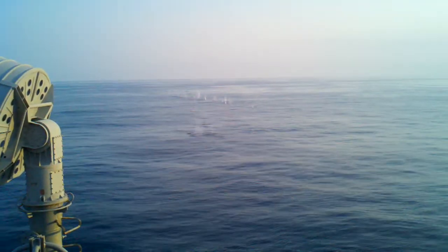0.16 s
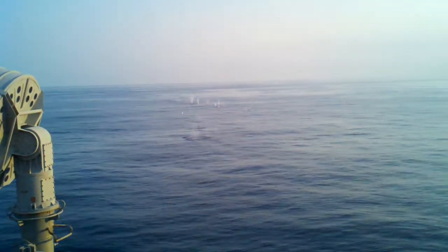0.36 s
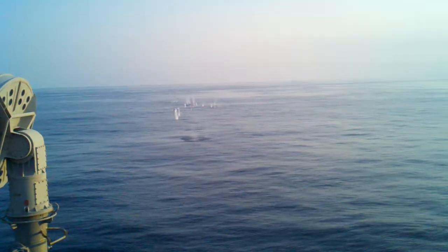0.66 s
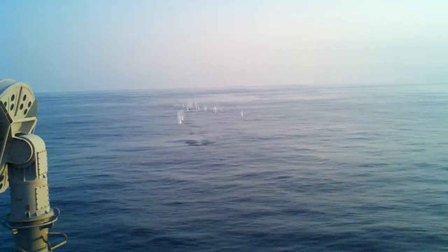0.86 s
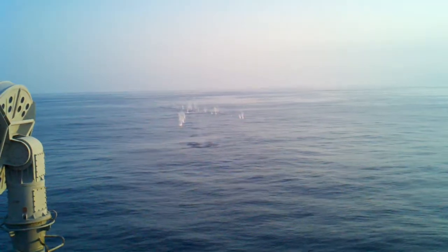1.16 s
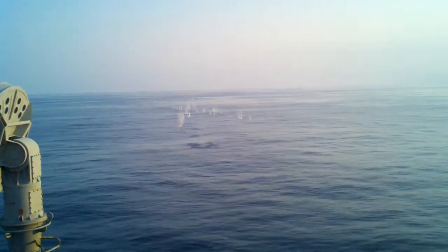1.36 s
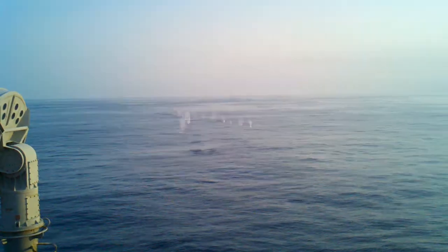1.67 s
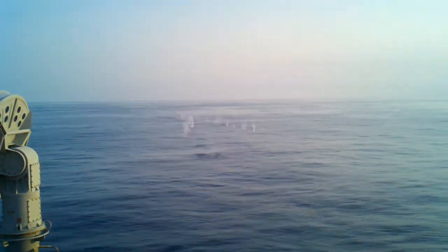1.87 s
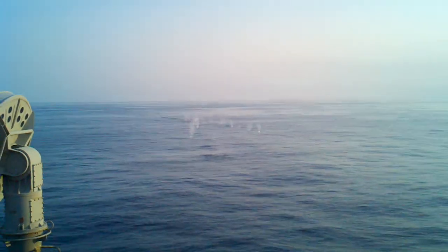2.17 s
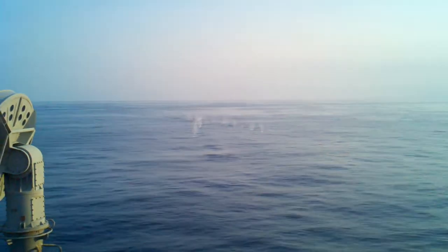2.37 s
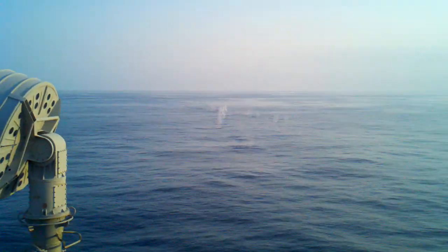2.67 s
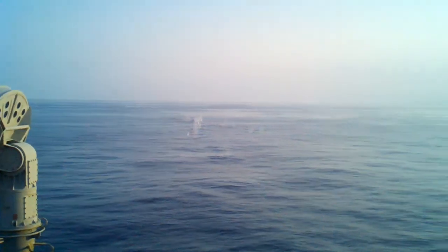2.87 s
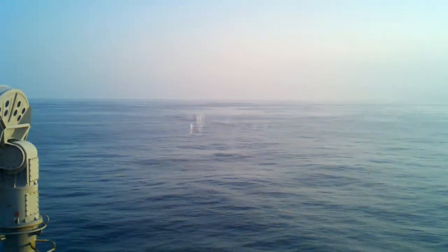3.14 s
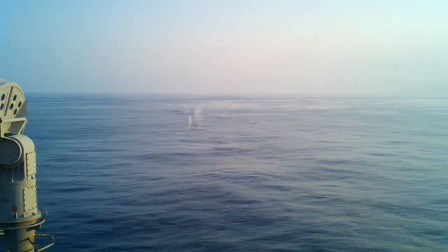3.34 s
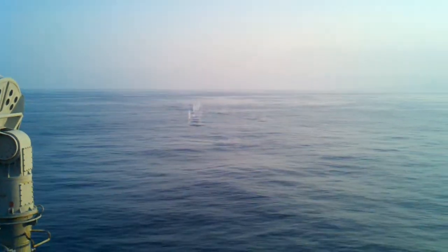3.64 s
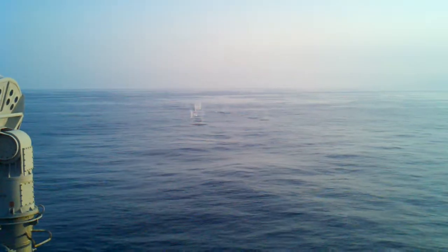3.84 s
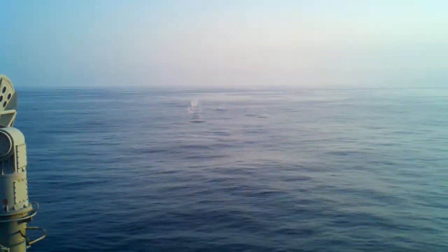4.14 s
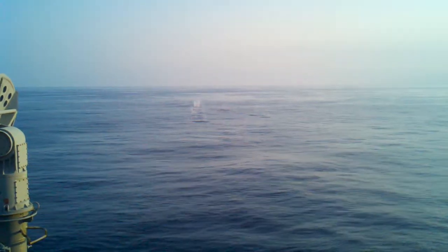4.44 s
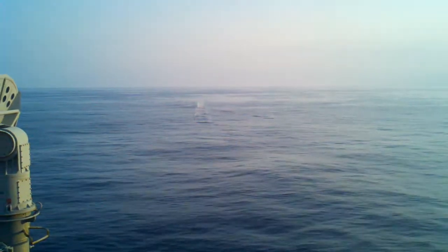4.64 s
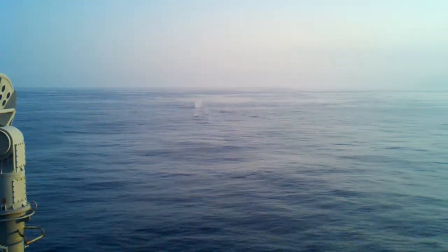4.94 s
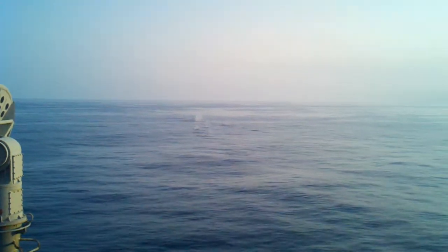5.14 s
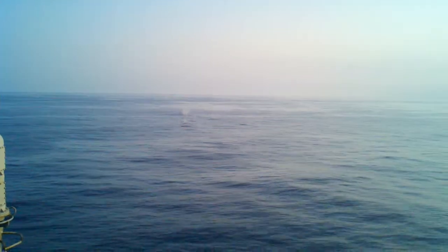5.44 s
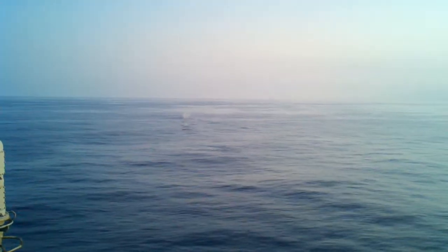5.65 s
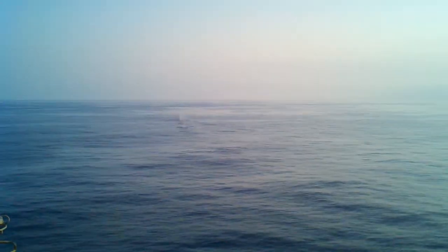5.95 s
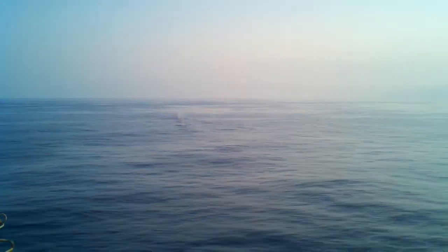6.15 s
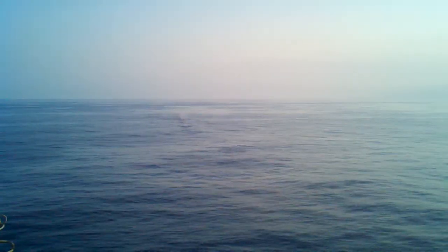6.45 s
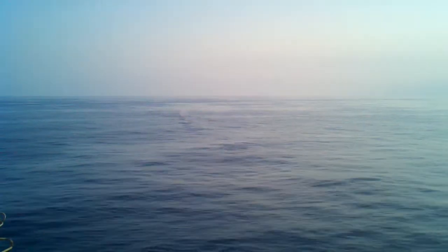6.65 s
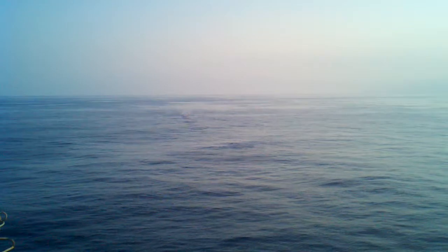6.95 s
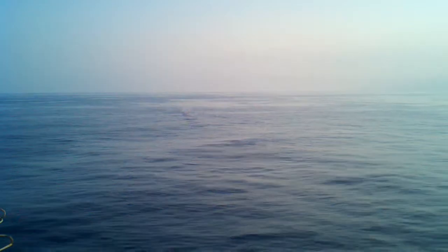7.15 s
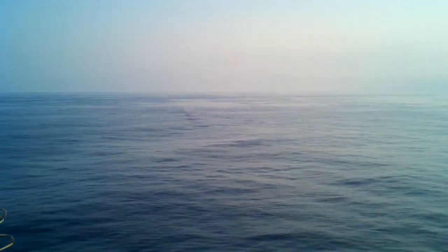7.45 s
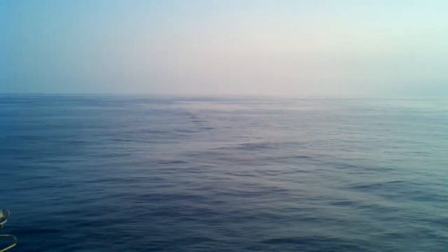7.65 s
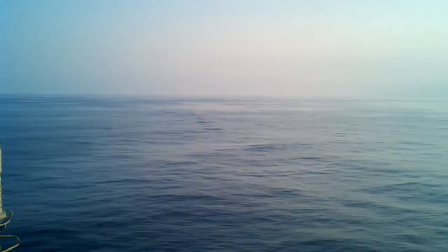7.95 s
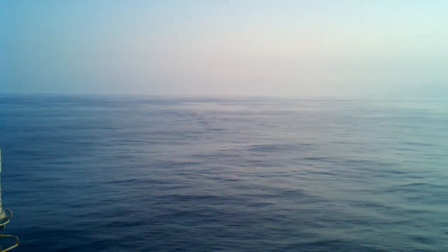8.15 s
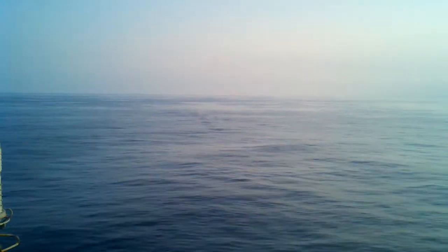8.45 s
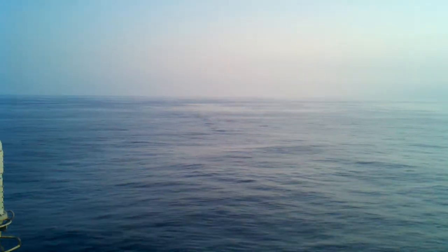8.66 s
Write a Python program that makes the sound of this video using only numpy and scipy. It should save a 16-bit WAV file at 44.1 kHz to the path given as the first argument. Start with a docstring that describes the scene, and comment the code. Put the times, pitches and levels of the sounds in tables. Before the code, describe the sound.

On a ship's deck at sea, a close machine gun snaps a very short burst while a slower, duller gun starts a three-second run. Bright close bursts cut through and outlast it. The fire stops, echoes roll across the water, and wind, distant thuds and faint brass tinkles show through. Three more short close bursts follow, the last longer. The stereo microphone is overloaded, gritty and clipped.

```python
"""Two close machine guns' worth of fire opens on a ship's deck: a short bright burst, then a slower gun farther off
fires one long burst, with more short close bursts through it and after it, over open sea.
Each shot is a filtered pulse with ringing steel reflections, noise crackle and a roll over the water.
In the pauses, shaped noise gives wind and sea, with distant thuds, rustles and sine-mode rings of spent cases.
The shots overload a stereo microphone: they are limited, widened and clipped."""
import sys
import numpy as np
from scipy import signal
from scipy.fft import rfft, irfft, next_fast_len
from scipy.io import wavfile
from scipy.ndimage import uniform_filter1d

SR = 44100
rng = np.random.default_rng(int(sys.argv[2]) if len(sys.argv) > 2 else 0)


def digitize_waveform(pressure):
    """Quantize a signal to 16-bit integers and store it at the path in sys.argv[1].

    Rows of a 2-D input are taken as channels; values are limited to [-1, 1].
    """
    field = np.atleast_2d(pressure).T
    bounded = np.clip(field, -1, 1)
    quanta = np.round(bounded * 32767).astype(np.int16)
    wavfile.write(sys.argv[1], SR, quanta)


N = 388521  # samples


def amp(db):
    """Turns decibels into an amplitude factor."""
    return 10 ** (np.asarray(db) / 20)


def read(points, hz, axis=1):
    """Reads one column of a spectrum, joined on a log-frequency axis."""
    columns = np.transpose(points)
    return np.interp(np.log(hz + 1), np.log(columns[0] + 1), columns[axis])


def add(mix, s, sound):
    """Mixes a sound in at time s, trimming what falls outside."""
    start = round(s * SR)
    sound = sound[..., max(-start, 0):]
    part = mix[..., max(start, 0):][..., :sound.shape[-1]]
    part += sound[..., :part.shape[-1]]


def wander(size, count):
    """Draws a random line through count points."""
    return np.interp(np.arange(size), np.linspace(0, size, count), rng.standard_normal(count))


def pulse(points, axis=1, size=4096):
    """Builds the sharpest causal (minimum-phase) pulse with a given spectrum."""
    hz = abs(np.fft.fftfreq(size, 1 / SR))
    log_gain = np.log(amp(read(points, hz, axis)))
    return np.fft.ifft(np.exp(np.conj(signal.hilbert(log_gain)))).real


def colour(x, points, axis=1):
    """Filters both channels by a spectrum."""
    return signal.oaconvolve(x, pulse(points, axis)[None], axes=1)[:, :x.shape[1]]


# Side level of sound arriving from all round. Each row: frequency in Hz, gain in dB.
SURROUND_SIDE = [(40, 3), (110, -6.5), (300, -5.5), (700, -5.5), (1300, 3), (2000, 2), (4000, -1),
                 (14000, 0)]


def diffuse(x):
    """Shapes the side of a (mid, side) pair as two close capsules hear sound from all round."""
    return np.vstack([x[:1], colour(x[1:], SURROUND_SIDE)])


def arrivals(db, hold_s, t60, tail_db, tail_t60, wall_s, wall_db, wall_t60, size=22050):
    """Envelope of reflections: the deck holds, then dies into a longer tail; a wall sends a late cluster."""
    t = np.arange(size) / SR
    nearby = amp(db - 60 * np.maximum(t - hold_s, 0) / t60)
    wall = (t > wall_s) * amp(wall_db - 60 * abs(t - wall_s) / wall_t60)
    tail = amp(tail_db - 60 * t / tail_t60)
    return np.sqrt(nearby ** 2 + wall ** 2 + tail ** 2)


def deck(envelope, spectrum, rings, width_hz, between_db, ring_s, size=22050, count=2):
    """Fixed reflections of one gun: early ones coloured by the steel's resonances, late ones toneless."""
    t, hz = np.arange(size) / SR, np.fft.rfftfreq(size, 1 / SR)
    peaks = sum(amp(db) ** 2 / (1 + (2 * (hz - f) / width_hz) ** 2) ** 2 for f, db in rings)
    ringing = np.sqrt(amp(between_db) ** 2 + peaks)
    early, late = rng.standard_normal((2, 2, size))
    for _ in range(count):  # the arrivals share out their energy among the resonances
        phase = np.angle(rfft(early * envelope))
        early = irfft(ringing * np.exp(1j * phase), size)
        early /= np.sqrt(uniform_filter1d(early ** 2, size=300, axis=1) + 1e-20)
    share = 1 / (1 + (t / ring_s) ** 8)  # early and late carry equal energy at ring_s
    blend = np.sqrt(share) * early + np.sqrt(1 - share) * late
    return amp(0.5) * diffuse(colour(blend * envelope, spectrum))


def gun(shots, blast, spectrum, reflections, gain_db, crackle_t60, snap_db, snap_s, bounce_s, bounce_db,
        slap_s, slap_db, lead_s, skew_s, grain_db):
    """Each shot repeats one blast and deck bounce; its echoes waver and its crackle is new every time."""
    t = np.arange(reflections.shape[1]) / SR
    report = np.zeros_like(reflections)
    add(report[0], 0, pulse(blast))
    add(report[0], bounce_s, amp(bounce_db) * pulse(blast))
    add(report[1], skew_s, -pulse(blast, axis=2))
    snap = amp(snap_db) * np.exp(-(t / snap_s) ** 2)
    envelope = amp(5.0 - 60 * t / crackle_t60) + snap + amp(-10 - 60 * t / 0.22)
    slap = report[0] + .5 * reflections[0]  # a far wall of the ship throws the shot back
    body, crackle = np.zeros((2, 2, N))
    for s, db, crackle_db in shots:
        level_db = db + gain_db
        wavering = reflections * amp(1.66 * wander(len(t), count=40))
        add(body, s - lead_s, amp(level_db) * (report + wavering))
        add(body[0], s + slap_s, amp(level_db + slap_db + 2.0 * rng.standard_normal()) * slap)
        grain = amp(grain_db * wander(len(t), count=256)) * rng.standard_normal((2, len(t)))
        add(crackle, s - lead_s, amp(level_db + crackle_db) * envelope * grain)
    return body + diffuse(colour(crackle, spectrum, axis=2))


# Close bursts, two of which overlap once. Each row: first shot in seconds, last shot in seconds,
# relative strength in dB, extra crackle in dB.
CLOSE_BURSTS = [(-.043, 0.0496, -12, 2), (1.363, 1.552, -10.5, -1), (2.5915, 3.6242, -10, -1),
                (5.618, 5.819, -11, 5), (5.8, 6.1738, -10.5, -1), (7.0178, 7.207, -10, -1),
                (8.3200, 8.7890, -10.5, 0.5)]


def near_shots():
    """Close guns cycle evenly while the trigger is held: (s, strength dB, extra crackle dB) per round."""
    cycle_s = .094  # nominal: each burst is divided evenly
    return [(s, db, crackle_db) for first, last, db, crackle_db in CLOSE_BURSTS
            for s in np.linspace(first, last, round((last - first) / cycle_s) + 1)]


# Close muzzle blast. Each row: frequency in Hz, relative level common to both capsules in dB,
# relative level opposed between them in dB.
CLOSE_BLAST = [(30, -16.5, 14), (101, 1.5, 22), (173.6, 7.5, 28.5), (290, 22.5, 30), (463, 11, 24.5),
               (770, 16, 20.5), (1954, -2, 17), (4100, -1.5, 1), (14000, -40, -28.5)]
# Sound after the close blast. Each row: frequency in Hz, deck reflections in dB, crackle in dB (relative).
CLOSE_COLOUR = [(40.2, -44, -52), (102.8, -34, -28.5), (208.7, -10.5, -20.5), (362, -8.5, -15.5),
                (681, -11.5, -13), (982, -16.5, -19), (1500, -22, -18), (2090, -22, -20), (3340, -32, -23),
                (4500, -40, -28.5), (8040, -32.5, -24.5), (13900, -50.5, -29)]
# Steel resonances the close guns excite. Each row: frequency in Hz, relative level in dB.
CLOSE_RINGS = [(159, 7.2), (261, 6.0), (301, 4.3), (353, 7.1), (404, 6.0), (479, 6.2), (514, 5.1),
               (579, 5.7), (708, 8.8), (832, 8.9), (915, 8.1), (947, 5.8), (1155, 7.5), (1187, 7.5),
               (1279, 9.2), (1335, 6.7), (1384, 6.8), (1693, 6.8), (1868, 8.5), (1968, 9.3)]


def near_gun():
    """Close guns: a bright blast pulse excites narrow resonances of the steel, with a strong early wall."""
    echoes = arrivals(db=-4.5, hold_s=0.044, t60=0.22, tail_db=-3, tail_t60=0.61,
                      wall_s=.028, wall_db=5, wall_t60=.07)
    reflections = deck(echoes, CLOSE_COLOUR, CLOSE_RINGS, width_hz=27.3, between_db=0.0, ring_s=0.12)
    return gun(near_shots(), CLOSE_BLAST, CLOSE_COLOUR, reflections, gain_db=10.5, crackle_t60=0.28,
               snap_db=-2.0, snap_s=0.018, bounce_s=0.0046, bounce_db=-6.0, slap_s=.101, slap_db=-11.5,
               lead_s=.0003, skew_s=0.00012, grain_db=1.5)


# The far gun's one long burst, its belt feeding unevenly. Each entry: shot time in seconds.
LONG_BURST = [0.0605, .17, 0.2819, .4, 0.5237, 0.6372, 0.7584, .8669, 0.9886, 1.104, 1.2275, 1.3478, 1.4584,
              1.5769, 1.694, 1.8126, 1.925, 2.0396, 2.147, 2.2561, 2.3692, 2.4719, 2.579, 2.6852, 2.8009,
              2.9186, 3.0258, 3.1371, 3.241]


def far_shots():
    """Equal rounds of the long burst: (s, strength dB, extra crackle dB)."""
    return [(s, -18, 1.36) for s in LONG_BURST]


# Far muzzle blast. Each row: frequency in Hz, relative level common to both capsules in dB,
# relative level opposed between them in dB.
DISTANT_BLAST = [(30, -30, -14), (107.5, 20.5, 28), (186, 26, 33), (250, 9.5, 36.5), (440, 25, 25.5),
                 (820, 21.5, 17), (1230, -5, 22), (2000, 0, 7.5), (4000, -11.5, -12), (14000, -38, -29)]
# Sound after the far blast. Each row: frequency in Hz, deck reflections in dB, crackle in dB (relative).
DISTANT_COLOUR = [(40, -44.5, -45), (96, -24.5, -41.5), (134, -15.5, -23), (251, -10, -15.5),
                  (410, -12.5, -11), (660, -18, -19), (866, -20.5, -22), (1260, -29.5, -26.5),
                  (2160, -26, -28), (3070, -28, -37.5), (5000, -54, -37.5), (7550, -40, -34.5),
                  (14160, -65, -43)]
# Steel resonances the far gun excites. Each row: frequency in Hz, relative level in dB.
DISTANT_RINGS = [(172, 6.4), (231, 6.3), (366, 10.5), (441, 4.1), (498, 3.5), (581, 7.7), (627, 5.6),
                 (673, 4.8), (711, 5.8), (746, 5.9), (818, 6.3), (883, 7.2), (929, 5.1), (1026, 4.4),
                 (1246, 5.3), (1279, 8.8), (1327, 8.3), (1418, 6.8), (1860, 7.3), (2003, 11.4)]


def far_gun():
    """Far gun: a duller blast pulse excites broad resonances of the steel, and leans a little left."""
    echoes = arrivals(db=.5, hold_s=0.022, t60=.14, tail_db=-2.5, tail_t60=.65,
                      wall_s=.066, wall_db=-3.0, wall_t60=0.18)
    reflections = deck(echoes, DISTANT_COLOUR, DISTANT_RINGS, width_hz=97, between_db=3, ring_s=0.11)
    far = gun(far_shots(), DISTANT_BLAST, DISTANT_COLOUR, reflections, gain_db=17.0, crackle_t60=0.4,
              snap_db=8, snap_s=0.0033, bounce_s=0.00484, bounce_db=-5.5, slap_s=.068, slap_db=-12,
              lead_s=0.00019, skew_s=.0005, grain_db=2.5)
    far[1] += 0.097 * far[0]  # feeding mid into side favours the left capsule
    far[0] += 0.031 * far[1]
    return far


# Long roll of the shots over the water. Each row: frequency in Hz, relative level in dB.
ROLL_COLOUR = [(40, -63.5), (130, -30), (400, -21), (900, -37.5), (2000, -39), (5000, -53.5), (8000, -55.5),
               (14000, -71)]


def roll(t60, boom_t60, boom_db, far_db, lumpy_db):
    """The shots scatter back from the waves: a lumpy boom, then a slow fade."""
    energy, t = np.zeros(N), np.arange(2 * SR) / SR
    fade = amp(-60 * t / t60) + amp(boom_db - 60 * t / boom_t60)
    swell = (fade * (1 - np.exp(-t / 0.039))) ** 2
    for shots, db in ((near_shots(), 0), (far_shots(), far_db)):
        for s, _, _ in shots:
            add(energy, s, amp(db) ** 2 * swell)
    lumps = amp(lumpy_db * wander(N, count=900))
    return diffuse(colour(np.sqrt(energy) * lumps * rng.standard_normal((2, N)), ROLL_COLOUR))


# Low rumbling swells in the buffeting, around the distant thuds. Each row: middle in seconds, half length in
# seconds, relative level in dB.
RUMBLE_SWELLS = [(4.25, 0.55, -57.5), (5.38, 0.19, -61.5), (6.97, 0.03, -64)]
# Rush of wind and sea. Each row: frequency in Hz, relative level in dB.
RUSH_COLOUR = [(40, -19.5), (150, 11.5), (400, 16.5), (800, 11), (1200, 12), (1500, 10), (1900, 13.5),
               (2500, 5.5), (3200, -0.5), (5000, -17.5), (8000, -16.5), (14000, -23)]
# Buffeting. Each row: frequency in Hz, relative level in dB.
BUFFET_COLOUR = [(30, 1.5), (70, 14.5), (130, 28), (250, 31), (500, 9.5), (1000, 3), (4000, -32)]


def wind(rush_db, ease_from_s, ease_db_per_s, buffet_db, mid_db, gust_db):
    """Noise rush of air and sea that eases late on, over unceasing lumpy buffeting unlike in each capsule."""
    t = np.arange(N) / SR
    rush = rush_db - ease_db_per_s * np.maximum(t - ease_from_s, 0)
    swells = sum(amp(db) * np.exp(-((t - s) / half) ** 2) for s, half, db in RUMBLE_SWELLS)
    buffet = amp(buffet_db) + swells
    gusts = wander(N, count=180)
    air = diffuse(colour(rng.standard_normal((2, N)) * amp(rush + .6 * gusts), RUSH_COLOUR))
    lumps = colour(rng.standard_normal((2, N)) * buffet * amp(gust_db * gusts), BUFFET_COLOUR)
    return air + lumps * amp([[mid_db], [0]])


# Distant thuds. Each row: start in seconds, relative level in dB.
DISTANT_THUDS = [(4.041, -25.5), (4.178, -23.5), (4.328, -26), (4.431, -22.5), (4.500, -23.5), (4.574, -25),
                 (4.839, -23.5), (4.961, -17.5), (4.985, -29), (5.195, -28), (5.323, -19), (6.837, -35),
                 (8.215, -28)]
# Tone of a thud or bolt knock. Each row: frequency in Hz, relative level in dB.
THUD_COLOUR = [(40, -17.5), (110, 10), (200, 22.5), (450, 15), (900, 6), (2000, -3.5), (4000, -47),
               (14000, -41.5)]


def thuds(gain_db, echo_s, echo_db, side_db, scatter_db, scatter_t60, bolt_lead_s, bolt_db):
    """Dull far-off reports, and a bolt knocking forward before each close burst: click, echo and scatter."""
    out, t = np.zeros((2, N)), np.arange(SR // 4) / SR
    bolts = [(burst[0] - bolt_lead_s, bolt_db) for burst in CLOSE_BURSTS]
    direct = np.array([[1], [-amp(side_db)]])
    for s, db in DISTANT_THUDS + bolts:
        hit = amp(scatter_db - 60 * t / scatter_t60) * rng.standard_normal((2, len(t)))
        add(hit, 0, direct)
        add(hit, echo_s, amp(echo_db) * direct)
        add(out, s, amp(db + gain_db) * hit)
    return colour(out, THUD_COLOUR)


# Spent cases landing. Each row: start in seconds, relative level in dB.
CASE_LANDINGS = [(3.96, -70.5), (4.15, -79), (4.38, -78), (6.70, -66), (7.67, -71)]
# Modes of a brass case. Each row: frequency in Hz, relative level in dB, 60 dB decay time in seconds.
BRASS_MODES = [(7140, -3, 1.5), (8200, -3, 1.3), (9130, -2.5, 3.1), (10799, 1, 2.4), (12462, -8, 1.5)]


def cases():
    """Spent brass cases ring thinly where they land: decaying sine modes that flutter as they roll."""
    out, t = np.zeros((2, N)), np.arange(SR) / SR
    for s, db in CASE_LANDINGS:
        for hz, mode_db, t60 in BRASS_MODES:
            flutter_db = 4 * wander(len(t), count=30)
            turns = hz * t + .5 * wander(len(t), count=40) + rng.random((2, 1))
            level = amp(db + mode_db + flutter_db - 60 * t / t60)
            add(out, s, level * np.sin(2 * np.pi * turns))
    return out


# Faint rustles near the microphone. Each row: start in seconds, relative level in dB, length in seconds.
RUSTLE_SWISHES = [(5.128, -57, 0.056), (5.204, -61, 0.11), (5.542, -45, 0.11), (6.913, -60, 0.063),
                  (7.77, -58.5, 0.056)]
# Tone of a rustle. Each row: frequency in Hz, relative level in dB.
RUSTLE_COLOUR = [(300, -30), (2000, -2.5), (4000, -0.5), (6500, 3.5), (10000, -1), (14000, -5.5)]


def rustles():
    """Brief soft swishes: bright noise under a smooth swell."""
    out = np.zeros((2, N))
    for s, db, length in RUSTLE_SWISHES:
        swell = np.hanning(round(length * SR))
        add(out, s, amp(db) * swell * rng.standard_normal((2, len(swell))))
    return colour(out, RUSTLE_COLOUR)


def scene():
    """Layers all sources as mid and side, then turns them into left and right capsule."""
    guns = near_gun() + far_gun()
    echoes = roll(t60=1.48, boom_t60=0.55, boom_db=14, far_db=-9, lumpy_db=1.0)
    air = wind(rush_db=-49, ease_from_s=3.57, ease_db_per_s=2.5, buffet_db=-75, mid_db=-3.5, gust_db=4.0)
    distant = thuds(gain_db=9.5, echo_s=.022, echo_db=-3.5, side_db=-21.5, scatter_db=-30,
                    scatter_t60=0.23, bolt_lead_s=0.013, bolt_db=-28.5)
    mid, side = guns + echoes + air + distant + cases() + rustles()
    return np.array([mid + side, mid - side])


def limit(x, ceiling_db, smooth_s):
    """A fast limiter holds both capsules down together as their smoothed power nears the ceiling."""
    window = np.hanning(round(smooth_s * SR) + 3)
    power = signal.oaconvolve((x ** 2).mean(0), window / window.sum(), "same")
    return x / np.sqrt(np.hypot(1, power / amp(ceiling_db) ** 2))


def record(dry):
    """The microphone limits, widens by cross-subtraction, restores bass, clips peaks and ends the band."""
    dry = limit(dry, ceiling_db=-9.5, smooth_s=0.0061)
    size = next_fast_len(N + SR, True)
    hz = np.fft.rfftfreq(size, 1 / SR)
    # each capsule loses a delayed copy of the other; depth by frequency in Hz
    depth = np.clip(read([(2600, .98), (4000, .9), (5300, .6), (8000, .45), (14000, .45)], hz), 0, 1)
    cross = depth * np.exp(-2j * np.pi * hz / 2620)  # delay of 1/2620 s
    bass = 1 + 414 / (1j * hz + 35)
    mid = irfft(rfft(dry.mean(0), size) * (1 - cross) * bass, size)[:N]
    side = irfft(rfft((dry[0] - dry[1]) / 2, size) * (1 + cross), size)[:N]
    wide = np.array([mid + side, mid - side])
    clipped = wide / (1 + wide ** 8) ** (1 / 8)
    band = signal.firwin(511, 14050, window=("kaiser", 7), fs=SR)  # low-pass, cutoff in Hz
    return signal.oaconvolve(clipped, band[None], "same")


dry = scene()
out = record(dry)
digitize_waveform(out)
```